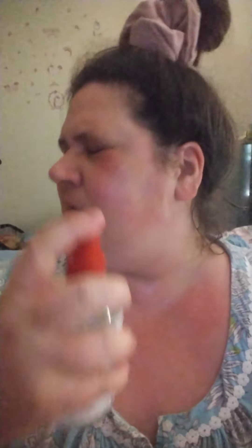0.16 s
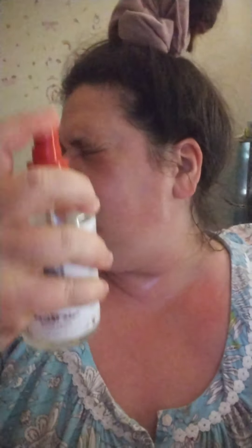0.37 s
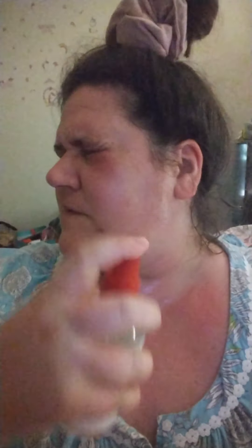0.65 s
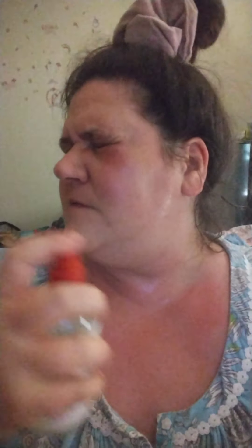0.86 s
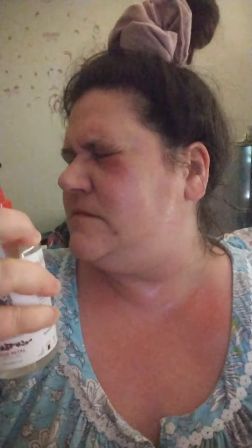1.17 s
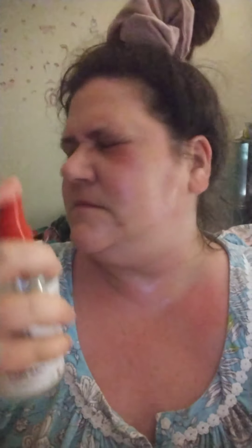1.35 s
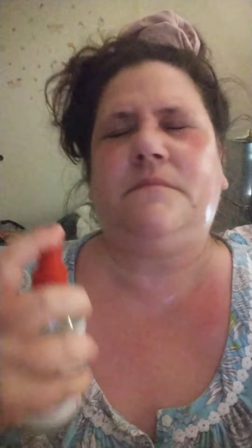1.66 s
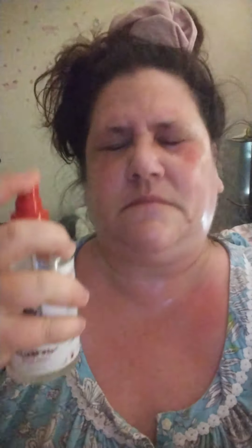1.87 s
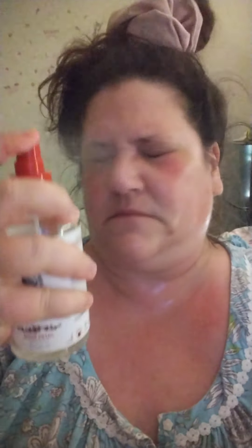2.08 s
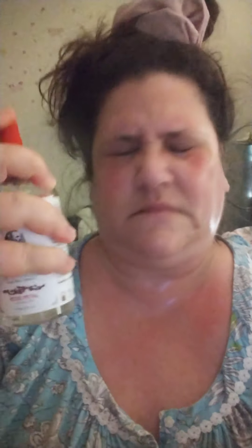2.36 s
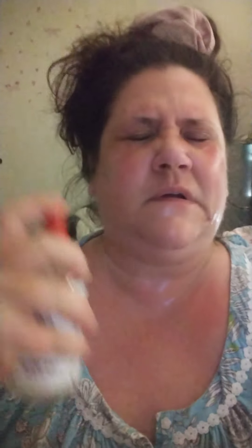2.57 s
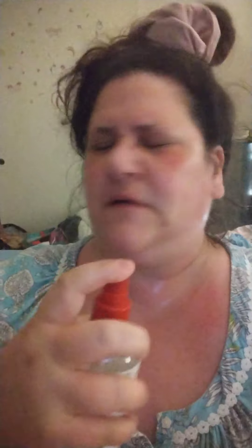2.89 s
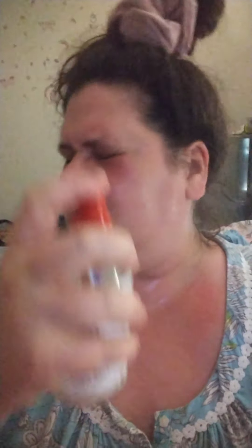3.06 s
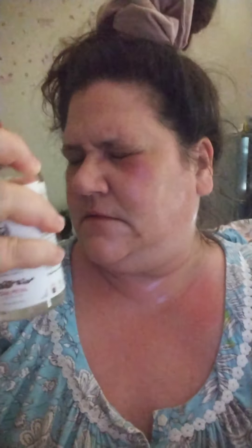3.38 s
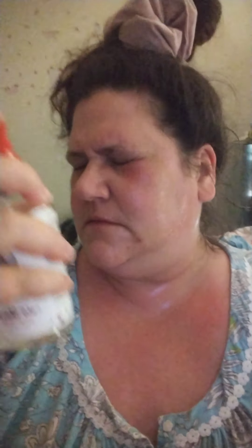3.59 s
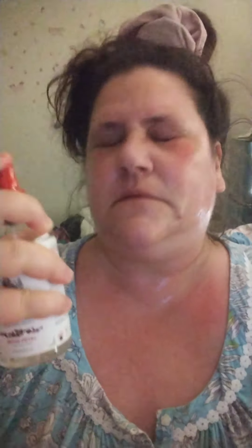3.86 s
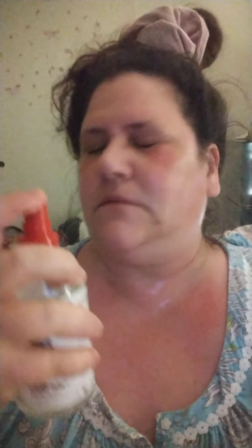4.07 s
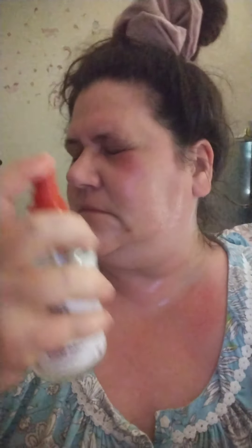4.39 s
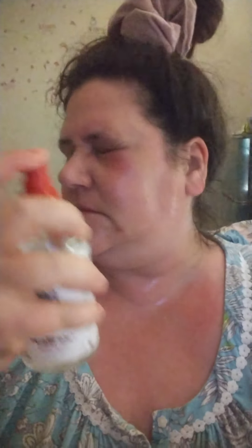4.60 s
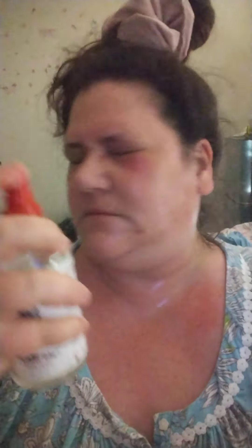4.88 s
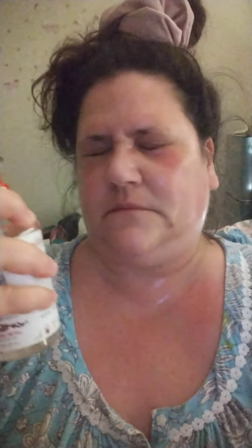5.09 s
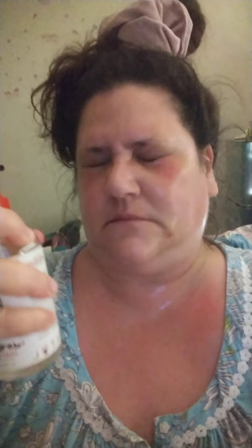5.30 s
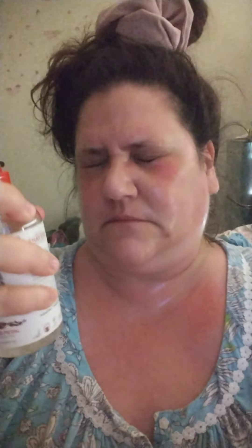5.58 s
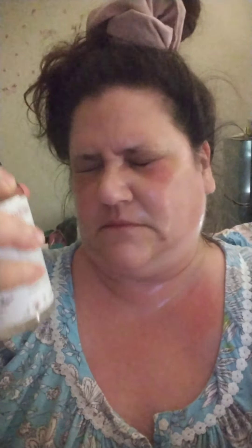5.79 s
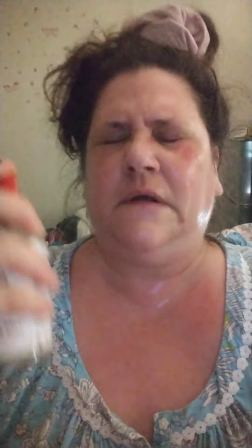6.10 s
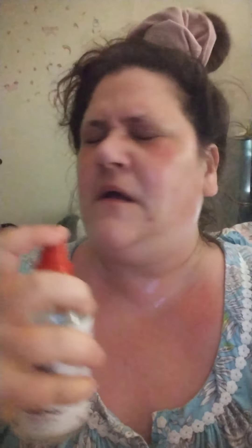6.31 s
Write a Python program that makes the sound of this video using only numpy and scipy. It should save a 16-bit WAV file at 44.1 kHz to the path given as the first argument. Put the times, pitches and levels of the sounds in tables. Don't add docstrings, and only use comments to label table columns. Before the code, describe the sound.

A small finger-pump spray bottle pumped rapidly up close, about three strokes a second, each a plastic click, short hissing mist burst and clack.

```python
import sys
import numpy as np
from scipy import signal
from scipy.fft import rfft, irfft, next_fast_len
from scipy.io import wavfile
from scipy.ndimage import uniform_filter1d, map_coordinates

SR = 44100
rng = np.random.default_rng(int(sys.argv[2]) if len(sys.argv) > 2 else 0)


def dump_mix(stems):
    frames = np.atleast_2d(stems).T
    limited = np.clip(frames, -1, 1)
    pcm = np.round(limited * 32767).astype(np.int16)
    wavfile.write(sys.argv[1], SR, pcm)


def volts_from_decibels(level):
    exponent = np.asarray(level, float) / 20
    return 10 ** exponent


N = 284445

# f/Hz, level/dB
COARSE_SPRAY = [(150, -62), (500, -14), (1200, -2.5), (2500, 1), (4000, 0.5), (6500, 0), (8500, -8.5),
                (11000, -15)]
# f/Hz, level/dB
FINE_MIST = [(5000, -37.5), (7500, -12.5), (9700, -5), (12000, -0.5), (14000, -6.5), (16000, -13)]


def spray():
    opens, drops, hiss_db, _ = strokes()
    noise = rng.standard_normal((3, N))
    noise = np.sqrt(0.15) * noise[0] + np.sqrt(0.85) * noise[1:]
    noise[1] += resonate(noise[0] - noise[1], 480, 680)
    sputter = volts_from_decibels(1.2 * walk(rate=500) + 0.8 * walk(rate=60))
    fine_level = flow(hiss_db + 1.5, opens, drops, rise_s=0.0017, swell_s=0.005, fall_s=0.021)
    coarse_level = flow(hiss_db - 7.5, opens, drops, rise_s=0.0011, swell_s=0.0024, fall_s=0.03)
    fine = unit(colour(noise, FINE_MIST)) * fine_level
    coarse = unit(colour(noise, COARSE_SPRAY)) * coarse_level
    return sputter * (fine + coarse)


# t/s, cap level/dB, stem level/dB, finger tap level/dB
VALVE_SNAPS = [(0.1796, -21.5, -19, -29.5), (.4687, -32, -15, -36), (0.7785, -23, -24.5, -31),
               (1.0956, -28, -17.5, -36), (1.391, -22.5, -18.5, -32.5), (1.6939, -24.5, -21, -29.5),
               (1.9866, -23, -18, -32.5), (2.2867, -29, -21, -32.5), (2.583, -21, -22.5, -29.5),
               (2.8795, -21.5, -24.5, -29.5), (3.1834, -31, -21, -34), (3.4821, -46, -23.5, -36.5),
               (3.7758, -34, -21.5, -36), (4.0831, -28.5, -27, -36), (4.391, -33, -26.5, -30.5),
               (4.679, -25.5, -25.5, -31.5), (4.9878, -28.5, -24.5, -39.5), (5.292, -28.5, -23, -35),
               (5.584, -34, -24.5, -34), (5.8541, -34.5, -26, -38), (6.1632, -27.5, -27.5, -32)]


def presses():
    tap_lead_s = 0.0082
    snaps, taps, knocks = [], [], []
    for s, cap, stem, tap in VALVE_SNAPS:
        snaps.append((s, 2556, cap, stem, stem - 1))
        tap_s = s - tap_lead_s
        taps.append((tap_s, 2490, tap - 4, tap - 19 + facing(tap_s + tap_lead_s)))
        knocks.append((tap_s, tap))
    return strike(snaps, taps, knocks)


# t/s, cap level/dB, nozzle level/dB, bottle knock level/dB
HEAD_STOPS = [(0.0209, -14.5, -11.5, -25.5), (0.2896, -21, -13, -21), (0.5907, -17.5, -13.5, -26),
              (.898, -17, -17, -29), (1.2138, -23.5, -19, -32.5), (1.511, -19, -27, -34),
              (1.811, -19.5, -16, -29), (2.1033, -26, -15, -27), (2.414, -30, -43, -34.5),
              (2.714, -29, -41, -35), (3.0037, -27, -22, -33), (3.2922, -25.5, -15, -28),
              (3.5914, -28, -10.5, -28.5), (3.8931, -24, -13, -30.5), (4.1914, -25.5, -12, -30),
              (4.4973, -26, -10, -31), (4.7855, -26.5, -11, -34.5), (5.0986, -28, -14, -40),
              (5.3945, -20, -13, -33), (5.683, -22, -13, -25), (5.974, -35, -49, -40.5),
              (6.2714, -26.5, -24.5, -31)]


def bottom_hits():
    snaps = [(s, 2166, cap, cap - 9 + facing(s), nozzle) for s, cap, nozzle, _ in HEAD_STOPS]
    knocks = [(s + 0.00344, knock) for s, _, _, knock in HEAD_STOPS]
    return strike(snaps, [], knocks)


# t/s, cap level/dB, stem level/dB, nozzle level/dB
HEAD_FREES = [(0.0348, -18.5, -21, -15), (0.303, -24.5, -17.5, -21), (0.6071, -16.5, -21.5, -19),
              (.911, -17.5, -20.5, -19), (1.2258, -21, -18.5, -30), (1.522, -20.5, -19.5, -33),
              (1.8224, -20.5, -19, -22), (2.1149, -26.5, -16.5, -29), (2.4231, -40, -21.5, -39),
              (2.7218, -23.5, -29.5, -41), (3.0125, -32.5, -24, -23), (3.303, -19.5, -17, -26),
              (3.6041, -21, -19, -19), (3.903, -22.5, -28, -20), (4.2019, -23.5, -22.5, -24),
              (4.5082, -23.5, -25.5, -24), (4.7962, -27.5, -22.5, -20), (5.1072, -31.5, -23, -21),
              (5.4077, -22, -18.5, -19), (5.6949, -22.5, -16, -22), (5.9815, -34, -32.5, -27),
              (6.2785, -29.5, -26, -28)]


def releases():
    snaps = [(s, 2616, *levels_db) for s, *levels_db in HEAD_FREES]
    rebounds = [(s + 0.0093, 2490, cap - 18, stem - 18) for s, cap, stem, _ in HEAD_FREES]
    return strike(snaps, rebounds, [])


# finger lifts t/s, its level/dB, head reaches the top t/s, its level/dB
WAY_UP = [(.09, -33, .1294, -39), (.3612, -39.5, .3982, -35.5), (.6611, -35, .6998, -34),
          (.963, -33, 1.004, -30.5), (1.2783, -36, 1.316, -34.5), (1.5803, -38.5, 1.62, -33.5),
          (1.8793, -37.5, 1.9176, -34.5), (2.1758, -38, 2.2188, -38.5), (2.4885, -39.5, 2.5295, -40.5),
          (2.78, -32.5, 2.824, -40.5), (3.0762, -38, 3.1178, -44.5), (3.3705, -40, 3.4077, -42),
          (3.67, -34.5, 3.713, -43.5), (3.9758, -40, 4.018, -50), (4.2736, -43, 4.312, -43.5),
          (4.58, -38, 4.6152, -39.5), (4.8676, -40.5, 4.9067, -43), (5.1806, -43, 5.219, -47),
          (5.4775, -39, 5.5174, -41), (5.7657, -38, 5.81, -70), (6.0552, -39.5, 6.1017, -40),
          (6.353, -39.5, 6.3848, -38)]
# t/s after it, relative cap level/dB, relative stem level/dB
TOP_BOUNCES = [
    (0.0132, -9, -8.5),
    (0.0239, -9, -16.5),
    (.037, -18, -14),
]
# t/s, level/dB
STRAYS = [
    (.755, -30),
    (4.0908, -48),
]


def returns():
    rattles, knocks = [], list(STRAYS)
    for lift, lift_db, top, top_db in WAY_UP:
        rattles.append((lift, 2190, lift_db, lift_db - 10.5 + facing(lift)))
        rattles.append((top, 2720, top_db, top_db - 10.5 + facing(top)))
        for after_s, cap, stem in TOP_BOUNCES:
            rattles.append((top + after_s, 3040, top_db + cap, top_db + stem + facing(top)))
        knocks += [(lift, lift_db - 16), (top, top_db - 14)]
    return strike([], rattles, knocks)


# share of the cap pitch, level/dB, t60/s
CAP_MODES = [(.62, -9, .005), (.8, -4, .009), (1.001, 6, .008), (1.17, -3, .007)]
# share of the cap pitch, level/dB, t60/s
LOOSE_CAP_MODES = [(.4, -11, 0.013), (.75, -4, 0.012), (1.001, 3, 0.017), (1.1, -5, 0.013)]
# f/Hz, level/dB, t60/s
STEM_MODES = [(3900, -14, .004), (4600, -13, .004), (5450, 0, .008), (5850, -6, .005), (6700, -12, .004)]
# f/Hz, level/dB, t60/s
NOZZLE_MODES = [(7770, -14, 0.01), (9880, 2.5, 0.0084), (11300, 3.5, 0.004), (12600, -1.5, 0.0095),
                (15000, -52, 0.0033)]
# f/Hz, level/dB, t60/s
BOTTLE_MODES = [(433, -3.5, 0.025), (630, -47, 0.0017), (870, 2, 0.011), (945, -24, 0.051)]
RING = 640


def strike(snaps, rattles, knocks):
    out = np.zeros((2, N + RING))
    rattles = [(*row, row[-1]) for row in rattles]
    for table, contact_s, cap in ((snaps, 0.00071, CAP_MODES), (rattles, 0.0018, LOOSE_CAP_MODES)):
        for s, cap_hz, *parts_db in table:
            parts = np.array(cap) * [cap_hz, 1, 1], STEM_MODES, NOZZLE_MODES
            for modes, db in zip(parts, parts_db):
                sound = ring(modes, contact_s, rise_s=contact_s / 4, apart=1.73)
                out[:, int(s * SR):][:, :RING] += volts_from_decibels(db) * sound
    thuds = [(s, max(cap_db, stem_db) - 17) for s, _, cap_db, stem_db, _ in snaps]
    for s, db in knocks + thuds:
        sound = ring(BOTTLE_MODES, 0.0012, rise_s=0.0004, apart=0.16)
        out[:, int(s * SR):][:, :RING] += volts_from_decibels(db - 4) * sound
    no_bass = signal.butter(4, 361, "high", fs=SR, output="sos")
    return signal.sosfilt(no_bass, out[:, :N])


def ring(modes, contact_s, rise_s, apart):
    t = np.arange(RING) / SR
    hz, db, t60 = np.transpose(modes)[:, :, None]
    detune, uneven = rng.standard_normal((2, len(modes), 1))
    chatter = rng.standard_normal((2, 1, RING)) * np.exp(-t / contact_s) * (1 - np.exp(-t / rise_s))
    chatter[1] = chatter[0] + apart * chatter[1]
    decay = np.exp((2j * np.pi * hz * (1 + 0.018 * detune) - np.log(1000) / t60) * t)
    rung = signal.fftconvolve(decay[None], chatter, axes=2)[..., :RING]
    rung /= np.abs(rung).max(axis=2, keepdims=True)
    rung = volts_from_decibels(db + 1.5 * uneven) * rung
    return rung.imag.sum(axis=1) / np.sqrt(np.sum(volts_from_decibels(2 * db)))


# t/s, treble level/dB
NOZZLE_TURN = [
    (0, 1),
    (2.1, 0),
    (2.8, 0),
    (3.3, -3),
    (5.6, -44),
    (6, 1),
    (6.45, -25),
]


def facing(s):
    return np.interp(s, *np.transpose(NOZZLE_TURN))


# f/Hz, width/Hz, level/dB
PUMP_RESONANCES = [(740, 2400, 1.5), (2350, 180, 13.5), (6530, 2200, 8.5), (9760, 790, 9.5),
                   (12100, 1100, -2)]


def piston():
    opens, drops, _, slide_db = strokes()
    rub = rng.standard_normal((2, N)) * volts_from_decibels(2.5 * walk(rate=400))
    rub = unit(sum(volts_from_decibels(db) * resonate(rub, hz, width) for hz, width, db in PUMP_RESONANCES))
    down = flow(slide_db - 0.5, opens - 0.036, opens, rise_s=0.0011, swell_s=0.0013, fall_s=0.024)
    up = flow(slide_db + 2, drops + 0.015, drops + 0.044, rise_s=0.0023, swell_s=0.014, fall_s=0.022)
    return rub * (down + up)


# f/Hz, level/dB
REFILL_COLOUR = [(400, -18), (1500, 3), (2300, 0), (3200, -4.5), (3800, -4.5), (5600, -9), (9800, -1.5),
                 (13500, -7), (15000, -30)]


def refill():
    _, drops, _, _ = strokes()
    level_db = -54.7 + 4.8 * facing(drops)
    grains = volts_from_decibels(2.2 * walk(rate=140) + 1.2 * walk(rate=21))
    rustle = unit(colour(grains * rng.standard_normal((2, N)), REFILL_COLOUR))
    starts = drops + 0.059
    return rustle * flow(level_db, starts, starts + 0.07, rise_s=0.0068, swell_s=0.023, fall_s=0.06)


# nozzle opens t/s, hiss level/dB, piston slide level/dB
JET_STROKES = [(-.1, -32.5, -41), (.21, -33.5, -44), (.501, -32, -41), (0.806, -31.5, -44.5),
               (1.127, -33, -45), (1.42, -32.5, -46.5), (1.722, -33, -45.5), (2.014, -32.5, -46),
               (2.323, -34, -47.5), (2.616, -32.5, -47.5), (2.912, -33, -49), (3.219, -36, -45),
               (3.516, -35.5, -43.5), (3.817, -36, -45), (4.119, -34.5, -46.5), (4.425, -35.5, -44),
               (4.71, -34.5, -47), (5.027, -36.5, -47), (5.326, -34.5, -44.5), (5.618, -34, -44.5),
               (5.888, -36.5, -50), (6.207, -36.5, -45.5)]


def strokes():
    opens, hiss_db, slide_db = np.transpose(JET_STROKES)
    drops = np.transpose(HEAD_STOPS)[0] - 0.009
    return opens, drops, hiss_db, slide_db


def flow(levels_db, start, stop, rise_s, swell_s, fall_s):
    t, out = np.arange(N) / SR, np.zeros(N)
    for a, b, db in zip(start, stop, levels_db):
        span = slice(max(int(a * SR) + 1, 0), int(b * SR) + SR // 2)
        on = t[span] - a
        jump = 0.49 * (1 - np.exp(-on / rise_s)) + 0.31 * (1 - np.exp(-on / swell_s))
        out[span] += volts_from_decibels(db) * jump * np.exp(-np.clip(t[span] - b, 0, None) / fall_s)
    return out


# f/Hz, t60/s, level/dB
ROOM_BANDS = [(780, 0.27, -14.5), (2780, 0.15, -14.5), (9800, 0.29, -12)]
# f/Hz, level/dB
ROOM_COLOUR = [(500, 3), (1500, 0), (12500, -5.5), (15000, -13)]


def room(x):
    t = np.arange(int(0.45 * SR)) / SR
    noise = rng.standard_normal((2, len(t))) * (1 - np.exp(-t / 0.00039))
    noise[1] += resonate(noise[0] - noise[1], 470, 1000)
    tail = 0
    for hz, t60, db in ROOM_BANDS:
        tail = tail + volts_from_decibels(db) * resonate(noise, hz, 1.9 * hz) * np.exp(-np.log(1000) * t / t60)
    wet = signal.fftconvolve(x[None], tail * volts_from_decibels(-27), axes=1)[:, :N]
    return colour(wet, ROOM_COLOUR)


# f/Hz, level/dB
HUM_COLOUR = [(20, -10), (60, -6.5), (100, -0.5), (135, -3.5), (230, -10.5), (500, -30)]
# t/s, level/dB
RUMBLE_LEVEL = [
    (0.0, -64),
    (0.09, -72),
    (2.57, -68),
    (2.64, -75.5),
    (3.97, -69.5),
    (4.15, -79),
    (4.29, -65.5),
    (4.58, -72.5),
    (5.78, -68.5),
    (6.45, -77),
]
# f/Hz, level/dB
AIR_COLOUR = [(150, -7.5), (430, -8), (1200, -32), (5000, -69), (15000, -40)]


def household():
    noise = rng.standard_normal((2, 3, N))
    noise = noise[:, :1] + 0.23 * noise[:, 1:]
    rumble_db = np.interp(np.arange(N) / SR, *np.transpose(RUMBLE_LEVEL))
    rumble = unit(colour(noise[0], HUM_COLOUR)) * volts_from_decibels(rumble_db + 2.5 + 2 * walk(rate=9))
    air = unit(colour(noise[1], AIR_COLOUR)) * volts_from_decibels(-71)
    return rumble + air


def unit(x):
    return x / np.sqrt(np.mean(x ** 2))


def colour(x, points):
    size = next_fast_len(x.shape[-1])
    hz, db = np.transpose(points)
    gain = volts_from_decibels(np.interp(np.log(np.fft.rfftfreq(size, 1 / SR) + 1), np.log(hz), db))
    return irfft(rfft(x, size) * gain, size)[..., :x.shape[-1]]


def resonate(x, hz, width_hz):
    return signal.lfilter(*signal.iirpeak(hz, hz / width_hz, fs=SR), x)


def walk(rate):
    k = int(SR / rate)
    held = np.repeat(rng.standard_normal(N // k + 1), k)
    return unit(uniform_filter1d(held, k)[:N])


def scene():
    near = spray() + presses() + bottom_hits() + releases() + returns() + piston() + refill()
    wet = room(near[0])
    low = signal.butter(2, 690, fs=SR, output="sos")
    near[1] += signal.sosfiltfilt(low, near[0] - near[1])
    wet[1] += signal.sosfiltfilt(low, wet[0] - wet[1])
    lag = 6.68 + 1.37 * walk(rate=3.058)
    near[1] = map_coordinates(near[1], [np.arange(N) - lag], order=3)
    return near + wet + household()


def band_limit(x):
    return signal.sosfilt(signal.butter(12, 16860, fs=SR, output="sos"), x)


# f/Hz, level/dB
FAR_PORT_COLOUR = [(60, -1), (900, -6.5), (2500, -2), (6500, 0.7), (8500, -1), (10500, -17.5), (13000, -20),
                   (16000, -9)]


def record(dry):
    ports = np.array([dry[0], colour(dry[1], FAR_PORT_COLOUR)])
    top_cut = signal.ellip(8, 0.5, 42, 15900, fs=SR, output="sos")
    ports = signal.sosfilt(top_cut, ports)
    return band_limit(ports)


dry = scene()
out = record(dry)
dump_mix(out)
```